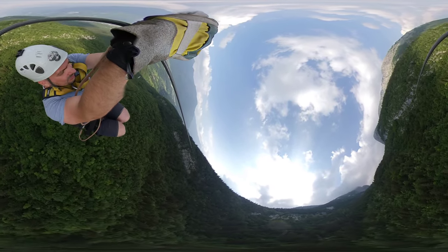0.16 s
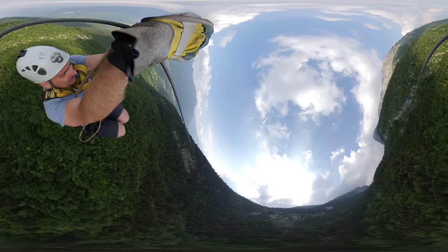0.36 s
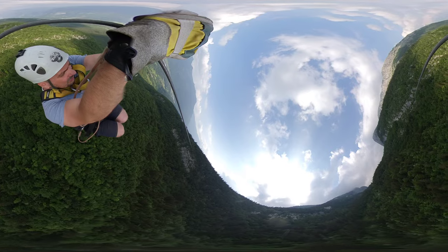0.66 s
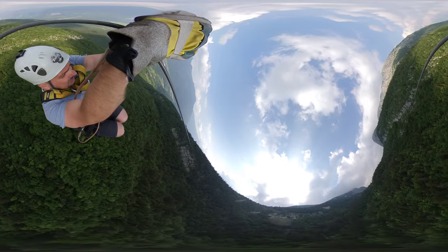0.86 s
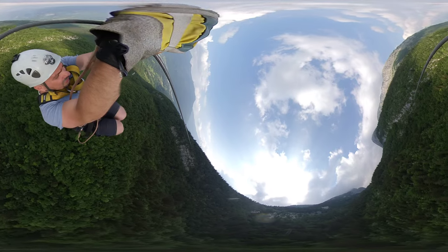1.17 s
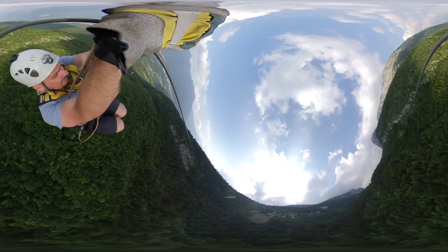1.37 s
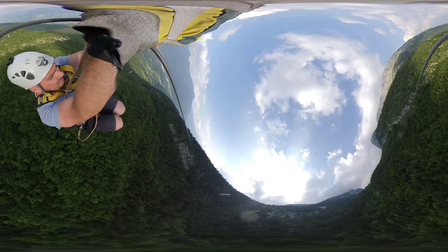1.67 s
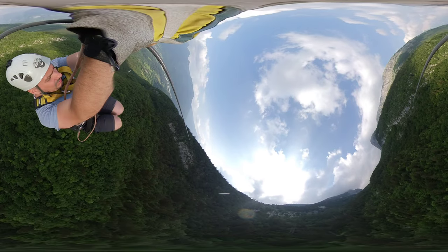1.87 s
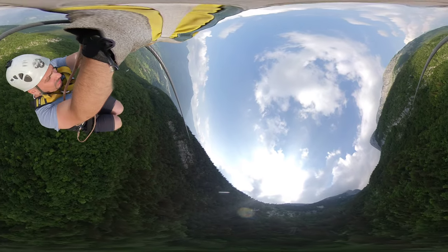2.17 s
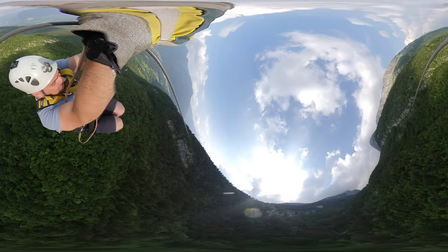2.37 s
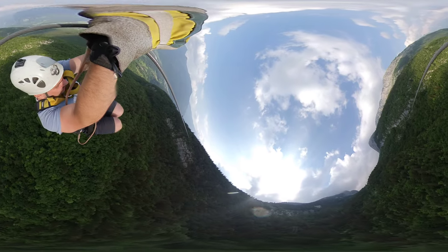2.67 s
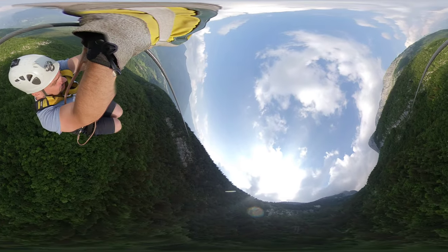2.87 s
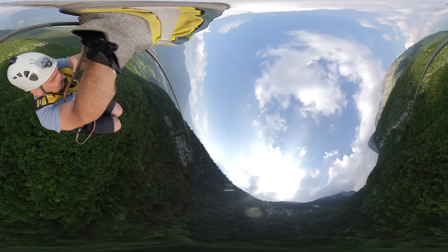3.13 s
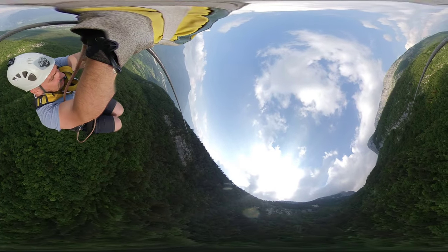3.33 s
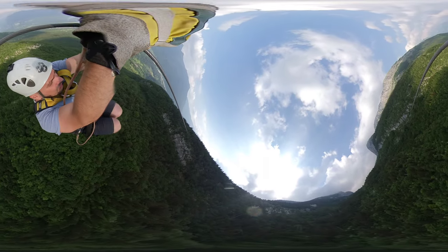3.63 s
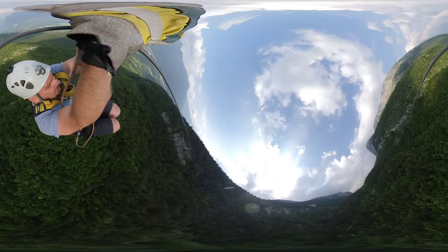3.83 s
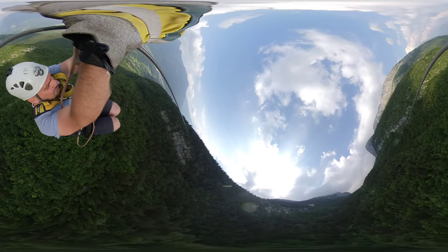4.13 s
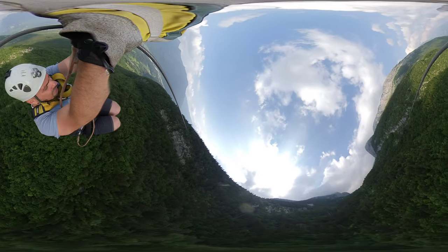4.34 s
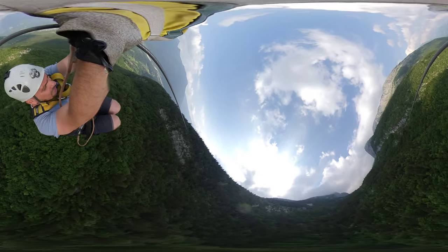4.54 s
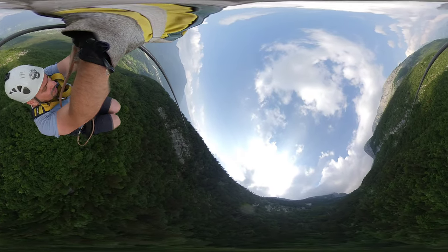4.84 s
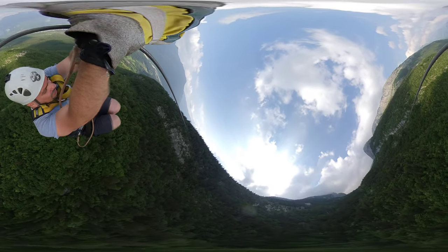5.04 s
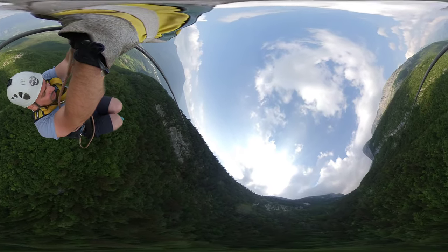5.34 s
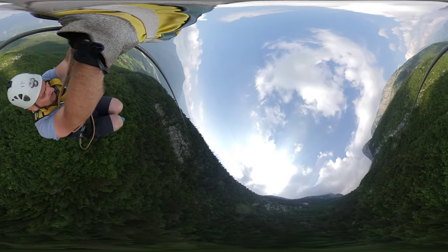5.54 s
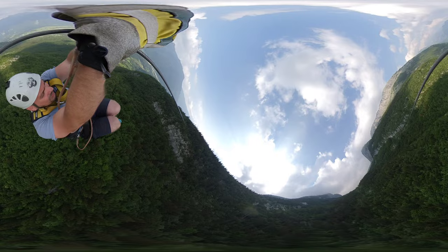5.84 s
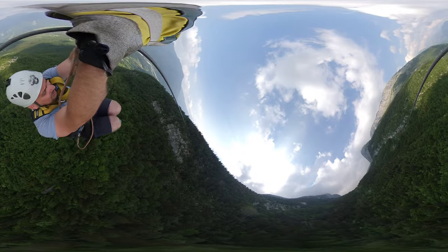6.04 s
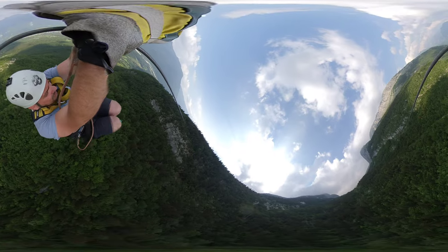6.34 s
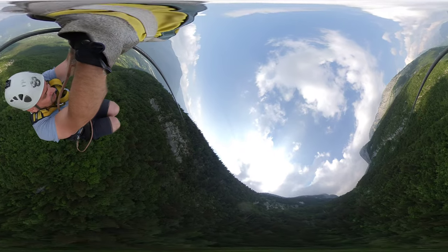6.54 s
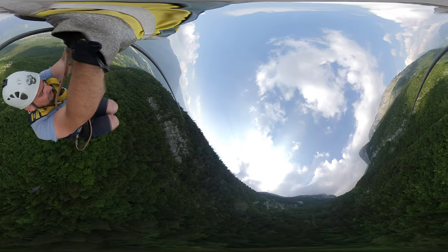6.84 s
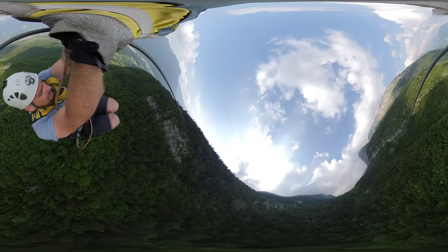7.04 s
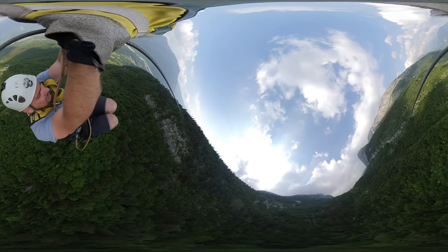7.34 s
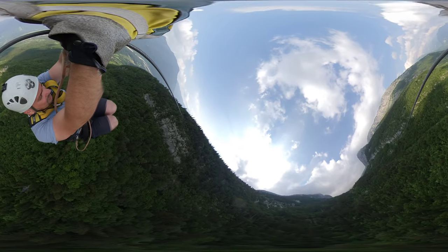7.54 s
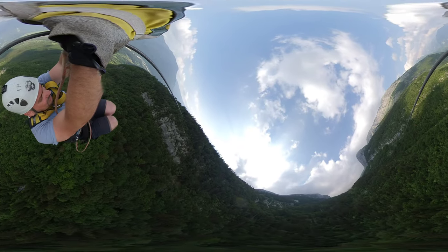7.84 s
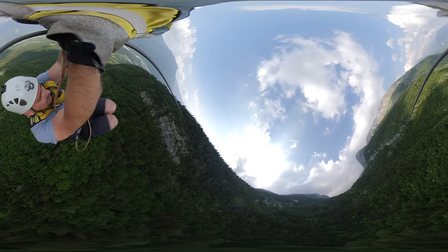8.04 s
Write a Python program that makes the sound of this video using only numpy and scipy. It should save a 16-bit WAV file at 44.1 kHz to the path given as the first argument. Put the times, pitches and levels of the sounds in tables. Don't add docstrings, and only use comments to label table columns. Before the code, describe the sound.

Wheels drum over a twisted wire rope in a high buzzing whine, hissing and ringing, while wind rumbles close by outdoors.

```python
import sys
import numpy as np
from scipy import signal
from scipy.fft import rfft, irfft, next_fast_len
from scipy.io import wavfile
from scipy.ndimage import uniform_filter1d, map_coordinates

SR = 44100
rng = np.random.default_rng(int(sys.argv[2]) if len(sys.argv) > 2 else 0)


def inscribe(sig):
    pcm = np.round(np.clip(np.atleast_2d(sig).T, -1, 1) * 32767)
    wavfile.write(sys.argv[1], SR, pcm.astype(np.int16))


def boost(x):
    u = np.asarray(x, float) / 20
    return 10 ** u


N = 361619

STRANDS = 6
LAG_S = 0.000347
# t/s, rate/Hz
STRAND_RATE = [(0.0, 1091.6), (0.54, 1096.6), (1.04, 1085.5), (1.37, 1096.8), (1.93, 1092.6),
               (2.31, 1081.0), (2.75, 1087.7), (3.24, 1081.1), (4.16, 1079.3), (4.78, 1061.8),
               (4.92, 1075.9), (5.23, 1052.8), (5.83, 1060.5), (5.93, 1045.7), (6.75, 1037.4),
               (7.04, 1025.2), (7.28, 1022.8), (8.2, 994.5)]


def unit(x):
    return x / np.sqrt(np.mean(x ** 2, axis=-1, keepdims=True) + 1e-20)


def along(points, hz):
    f, *cols = np.transpose(points)
    return np.array([np.interp(np.log(hz + 1), np.log(f + 1), c) for c in cols])


def curves(rows):
    s, *cols = np.transpose(rows)
    return np.array([np.interp(np.arange(N) / SR, s, c) for c in cols])


def wobble(rate_hz, count=1):
    knots = rng.standard_normal((count, 1000))
    step = 32
    at = np.arange(N // step + 1) * step * rate_hz / SR
    coarse = [map_coordinates(k, [at], mode="wrap") for k in knots]
    return uniform_filter1d(np.repeat(coarse, step, axis=1), size=step, axis=1)[:, :N]


def filtered(x, response):
    m = next_fast_len(N + 8192)
    return irfft(rfft(x, m) * response(np.fft.rfftfreq(m, 1 / SR)), m)[..., :N]


def patchy(patchy_db):
    z = signal.stft(rng.standard_normal((2, N)), nperseg=512)[2]
    field = rng.standard_normal(z.shape[1:])
    for axis in (0, 1):
        field = uniform_filter1d(field, size=7, axis=axis)
    return signal.istft(z * boost(patchy_db * field / field.std()), nperseg=512)[1][:, :N]


def swayed(rows):
    # t/s, lean onto rear wheel, twist about rope, load on plates, tilt
    sway = [(0.0, -0.4, -0.4, -0.9, 1.0), (0.6, -0.4, 0.7, -0.7, 2.3), (0.93, 2.0, -2.4, -0.4, 0.6),
            (1.37, -1.3, 0.9, -0.0, 0.2), (1.8, -0.2, 0.1, -2.9, -1.6), (2.35, -1.2, -0.8, -0.9, -1.2),
            (2.82, -0.5, 1.5, -0.6, 0.8), (3.65, 1.6, -1.5, -0.8, 0.1), (3.85, -0.9, 1.6, 0.9, 1.2),
            (4.82, -1.2, -0.6, 0.4, -2.2), (4.95, -1.2, 0.6, 1.3, 0.4), (5.16, -1.0, -2.2, 1.6, -1.3),
            (5.95, -0.6, 0.5, 1.0, 1.9), (6.37, 2.3, -2.1, 0.1, -0.9), (6.75, 1.0, 1.2, -0.1, 0.2),
            (7.3, -0.1, -1.4, 1.4, 0.0), (7.7, 1.8, 2.1, -0.1, -0.2), (8.2, 1.4, 2.0, 1.8, -2.4)]
    return np.asarray(rows) @ np.vstack([np.ones(N), curves(sway)])


def lay_angle():
    hz = curves(STRAND_RATE)[0] * (1 + 0.003014 * wobble(14)[0])
    return 2 * np.pi * np.cumsum(hz) / STRANDS / SR


def orders(angle, multiples, level_db, fade_db, drift_rad, rate_hz, lag_s):
    out = np.zeros((2, N))
    for k, db, lag in zip(multiples, level_db, lag_s):
        late = np.array([angle - lag * SR * np.gradient(angle), angle])
        shared, *own = wobble(rate_hz, count=5)
        fade = fade_db * (shared + 1.2 * np.array(own[:2]))
        drift = drift_rad * (shared + 0.77 * np.array(own[2:]))
        out += np.sqrt(2) * boost(db + fade) * np.sin(k * late + drift)
    return out


def proud():
    # t/s, length/s, level/dB
    spells = [(-.1, 0.67, 6), (0.656, 0.42, 8), (2.2, 0.98, 6), (3.1, 0.76, 10), (4.05, 0.27, 9),
              (4.45, 0.33, 6), (4.953, 0.41, 7.5), (5.5, .45, 7.5), (6.048, 0.67, 8.5), (7.95, 0.26, 11)]
    edge_s = 0.069
    t = np.arange(N) / SR
    return sum(db * np.clip(np.minimum(t - s, s + length - t) / edge_s, 0, 1) for s, length, db in spells)


def whine(angle):
    # multiple of lay rate, left level/dB, right level/dB
    lay_lines = [(5, -52.0, -50.0), (7, -52.0, -47.0), (8, -51.0, -57.0), (9, -38.0, -38.0),
                 (10, -49.0, -44.0), (11, -54.0, -46.0), (14, -50.0, -49.0), (15, -39.0, -38.0),
                 (16, -41.0, -43.0), (17, -45.0, -45.0), (19, -41.0, -45.0), (21, -39.0, -38.0),
                 (22, -41.0, -44.0), (23, -44.0, -46.0), (27, -42.0, -37.0), (28, -42.0, -39.0),
                 (29, -43.0, -38.0), (30, -39.0, -36.0), (33, -38.0, -38.0), (34, -36.0, -36.0),
                 (36, -34.0, -35.0), (37, -37.0, -40.0), (39, -39.0, -41.0)]
    # t/s, left lag of 2nd overtone/us, of 3rd/us
    heading = [(0, -75, 110), (1.25, -120, 130), (1.5, -245, 50), (2.25, -210, 40), (2.5, -70, 150),
               (3.0, 30, 160), (3.5, -110, 205), (3.75, -110, 170), (4.0, -330, 150), (4.5, -250, 25),
               (4.75, -270, 25), (5.3, -370, 290), (5.95, -150, 570), (6.45, -135, 630), (6.75, -70, 560),
               (7.2, 20, 560), (7.7, -80, 620), (8.2, -130, 620)]
    # level at rest/dB, dB per lean, per twist, per load, per tilt
    overtone_sway = [
        [(-33.8, -1.4, -2.6, -.2, 1.4), (-35.6, 3.1, -2.1, -1.3, -.8)],
        [(-33, 3, 1.8, -1.7, 1.3), (-31, -2.1, .6, 0, .2)],
        [(-36, 2.6, -.4, -1.8, .3), (-38.8, 3.7, -.7, -2.6, -.8)],
    ]
    halfway_orders, whole_orders = (9, 15, 21), (12, 18, 24)

    full_speed_hz, db_per_hz = 1074, [[0.0566], [0.07]]
    strand_db = -26 + db_per_hz * (full_speed_hz - curves(STRAND_RATE)[0])
    strand = orders(angle, [STRANDS], [strand_db + 0.5], fade_db=0.7, drift_rad=0.031, rate_hz=14, lag_s=[.0003])

    half_db = -46 + proud() + wobble(2.12)[0] + [[.4], [.6], [1.5]]
    halfway = orders(angle, halfway_orders, half_db, fade_db=3, drift_rad=0.46, rate_hz=15,
                     lag_s=[LAG_S, LAG_S, .00029])

    second_us, third_us = curves(heading)
    lags = [second_us / 1e6, third_us / 1e6, np.linspace(-.00011, -.00023, N)]
    overtone_db = swayed(overtone_sway) + [[[1.5]], [[1.5]], [[3]]]
    overtones = orders(angle, whole_orders, overtone_db, fade_db=1, drift_rad=.35, rate_hz=16, lag_s=lags)

    lines = np.array([row for row in lay_lines if row[0] not in halfway_orders])
    uneven = orders(angle, lines[:, 0], lines[:, 1:, None] - .5, fade_db=3, drift_rad=1.1, rate_hz=10,
                    lag_s=[LAG_S] * len(lines))
    return strand + halfway + overtones + uneven


def rolling(angle):
    # f/Hz, left level/dB per Hz, right level/dB per Hz
    hiss_spectrum = [(500, -29.5, -30), (970, -8.5, -5.5), (1390, -6, -6), (2030, -11, -4),
                     (3160, -1.5, -1.5), (3780, 1, 1.5), (4530, 0, -6.5), (5600, 0.5, 1), (6730, 2.5, 5),
                     (8700, 3.5, 3), (9900, 0.5, -8), (10800, -8.5, -1.5), (12800, -7.5, -5.5),
                     (15300, -2, -10.5)]
    # f/Hz, width/Hz, left level/dB, right level/dB
    plates = [(4980, 900, -13, 6.5), (7850, 1140, 4, 7.5), (9155, 200, -2.5, 13.5), (10290, 970, 4, 2.5),
              (12000, 160, 8.5, -7), (14700, 900, -28, -29)]
    # f/Hz, width/Hz, left level/dB, right level/dB
    singing = [(5880, 99, 9.5, -6.5), (6470, 255, 7, -1.5)]
    # f/Hz, correlation
    alike = [(1000, 0.41), (1650, 0.4), (2300, 0.29), (2900, 0.24), (3500, 0.13), (4700, 0.48), (5500, .25),
             (5950, 0.14), (6600, 0.28), (7000, .15), (8000, 0.12)]
    # level at rest/dB, dB per lean, per twist, per load, per tilt
    ring_sway = [
        (-5.5, 1.8, -0.31, 5, 1.3),
        (0, 1.7, .3, 1.8, 0.38),
    ]
    # level at rest/dB, dB per lean, per twist, per load, per tilt
    roll_sway = [
        (0, 0.027, -0.25, -0.4, -0.27),
        (0, 0.85, -.1, .5, -0.28),
        (0, -0.79, .1, -0.9, -0.27),
        (0, -0.066, 0.3, -.2, .4),
    ]
    centres_hz = [3300, 6170, 8060, 12000]
    lag_top_hz = 6690

    def peak(f, centre, width, left, right):
        return boost([[left - 2], [right - 2]]) / (1 + ((f - centre) / width * 2) ** 2)

    def turn(f):
        return np.arccos(np.clip(along(alike, f), 0, 1)) / 2

    def lag(f):
        return np.exp(-2j * np.pi * f * LAG_S * (f < lag_top_hz) * np.array([[1], [0]]))

    def body(f):
        return np.sqrt(boost(along(hiss_spectrum, f)) ** 2 + sum(peak(f, *p) ** 2 for p in plates))

    def share(k):
        return lambda f: np.interp(np.log(f + 1), np.log(centres_hz), np.eye(4)[k])

    pulse = 1 + 0.023 * np.sin(angle) + 0.058 * np.sin(3 * angle) + 0.14 * np.sin(STRANDS * angle)
    a, b = pulse * patchy(patchy_db=1.68)
    common = filtered(a, lambda f: lag(f) * np.cos(turn(f)))
    opposed = filtered(b, lambda f: lag(f) * np.sin(turn(f)) * [[1], [-1]])
    pair = common + opposed
    hiss = filtered(pair, body)
    ring_db = swayed(ring_sway) + 0.78 * wobble(3.76, count=2)
    for db, mode in zip(ring_db, singing):
        hiss = hiss + boost(db) * filtered(pair, lambda f: peak(f, *mode))

    flutter_db = [.6, .8, 1.5, 1.5] * wobble(36, count=4).T
    region_db = swayed(roll_sway) + 0.64 * wobble(5, count=4) + flutter_db.T
    out = sum(boost(db) * filtered(hiss, share(k)) for k, db in enumerate(region_db))
    return boost(-12.0) * out / hiss.std()


def gusts():
    # t/s, peak level/dB
    gust_peaks = [(0.309, -19), (0.426, -24.5), (0.633, -26), (0.81, -29), (1.015, -20), (1.522, -24),
                  (1.672, -20), (1.939, -23.5), (2.202, -25.5), (2.48, -24), (2.629, -22), (2.799, -18),
                  (3.775, -23), (4.001, -20), (4.269, -20), (4.45, -22), (5.2, -28), (6.145, -22.5),
                  (6.31, -20), (6.954, -24.5), (7.121, -27), (7.597, -24), (7.765, -22.5), (7.999, -20)]
    # t/s, level/dB
    stalls = [(.09, -5), (1.44, 5), (2.862, -5), (4.17, -6), (4.57, -6), (7.88, -6)]
    rise_s, fall_s, lull_s = 0.0057, 0.076, 0.02
    hits, t = np.zeros(N), np.arange(SR // 2) / SR
    s, db = np.transpose(gust_peaks)
    hits[(s * SR).astype(int)] = np.clip(db + 25, 0, 4.5)
    shape = np.exp(-t / fall_s) - np.exp(-t / rise_s)
    lulls = sum(db * np.exp(-((np.arange(N) / SR - s) / lull_s) ** 2) for s, db in stalls)
    return signal.fftconvolve(hits, shape / shape.max())[:N] + lulls


def wind():
    # t/s, strength/dB, left-right difference/dB as the camera turns
    strength = [(0.0, -32, 4), (0.02, -34.5, 1.5), (1.16, -37.5, 2.0), (1.85, -34.5, 4.5),
                (3.52, -38.5, -2.5), (3.72, -37.5, 1), (6.67, -40, -3.5), (6.99, -35.5, 6),
                (7.42, -35.5, -1), (7.81, -36.5, 5.5), (7.86, -40, -3.5), (8.2, -39, 6)]
    # f/Hz, left level/dB per Hz, right level/dB per Hz
    buffet = [(40, -47, -23), (101, -34, -19.5), (153, -10.5, -20.5), (232, -5, -9.5), (395, 1, 2),
              (566, 3, 2.5), (950, 3, -1), (1440, -7.5, -5), (3000, -23.5, -15.5)]
    calm_db, slow_share = 5, 0.55
    gust_share = [[1.5], [0.22]]

    level_db, pan_db = [c.mean() + slow_share * (c - c.mean()) for c in curves(strength)]
    air = unit(filtered(patchy(patchy_db=0.5), lambda f: boost(along(buffet, f))))
    rumble = filtered(air, lambda f: 1 / (1 + (f / 230) ** 4))
    air = air + rumble * (boost(3.0 * wobble(16, count=2)) - 1)
    puffs = np.clip(wobble(120, count=2), 0, 2) ** 2
    lumps = boost([[2.3], [1.1]] * wobble(30, count=2) + [[1.6], [.6]] * puffs)
    port_db = level_db + calm_db + gust_share * gusts() + [[.5], [-.5]] * pan_db
    return boost(port_db) * unit(lumps * air)


def scene():
    angle = lay_angle()
    return whine(angle) + rolling(angle) + wind()


def merged_treble(x):
    # f/Hz, usual left-right likeness, its spread from frame to frame
    merged = [(7200, .57, .83), (7900, .7, .73), (8600, .42, .9), (10000, .28, .86), (10700, .37, .78),
              (11400, .88, 1.15), (12000, .52, .93), (12700, .22, 1.05), (13400, -.04, 1.04),
              (14800, 0, .78), (15500, .2, 1.3)]
    hop, start, band, first_band, last_band = 1024, 307, 32, 10, 23
    count = (N - start) // hop - 1
    k = np.arange(2 * hop) + .5
    bins = np.arange(first_band * band, last_band * band) + .5
    window = np.sqrt(2 / hop) * np.sin(np.pi * k / (2 * hop))
    basis = window[:, None] * np.cos(np.pi / hop * np.outer(k + hop / 2, bins))
    at = start + hop * np.arange(count)[:, None] + np.arange(2 * hop)
    both = (x[:, at] @ basis).reshape(2, count, -1, band)

    mood = .96 * rng.standard_normal(both.shape[1:3]) + .28 * rng.standard_normal((count, 1))
    mood = .9 * mood + .44 * np.roll(mood, 1, axis=0)
    usual, spread = along(merged, bins.reshape(-1, band).mean(axis=1) * SR / (2 * hop))
    apart = np.clip((1 - usual - spread * mood) / 2, 0, 1) ** .7
    turn = np.arccos(1 - 2 * apart)[..., None] / 2
    mid = np.cos(turn) * unit(both[0] + both[1])
    side = np.sin(turn) * unit(both[0] - both[1])

    level = np.sqrt(np.mean(both ** 2, axis=-1, keepdims=True))
    level = level ** .4 * np.sqrt(level[0] * level[1]) ** .6
    change = level * [mid + side, mid - side] - both
    frames = change.reshape(2, count, -1) @ basis.T
    return x + [np.bincount(at.ravel(), f.ravel(), N) for f in frames]


def top_cut(x):
    return signal.sosfilt(signal.butter(12, 16870, fs=SR, output="sos"), x)


def record(dry):
    top_hz = 15750
    limited = dry / (1 + np.abs(dry / 0.8) ** 8) ** (1 / 8)
    mix = merged_treble(filtered(limited, lambda hz: hz < top_hz))
    return top_cut(mix)


dry = scene()
out = record(dry)
inscribe(out)
```